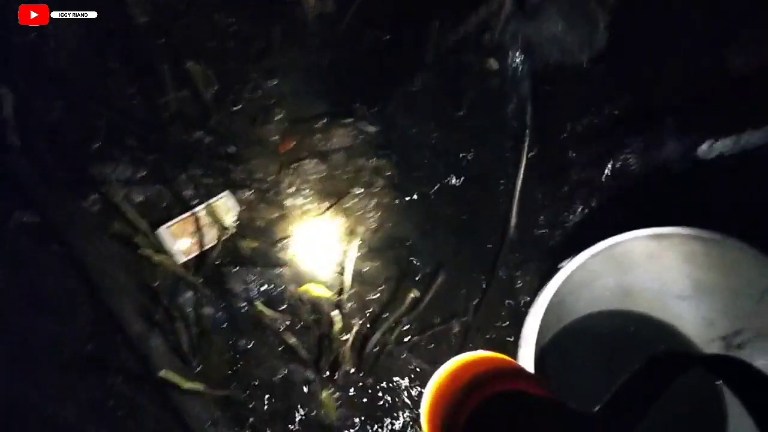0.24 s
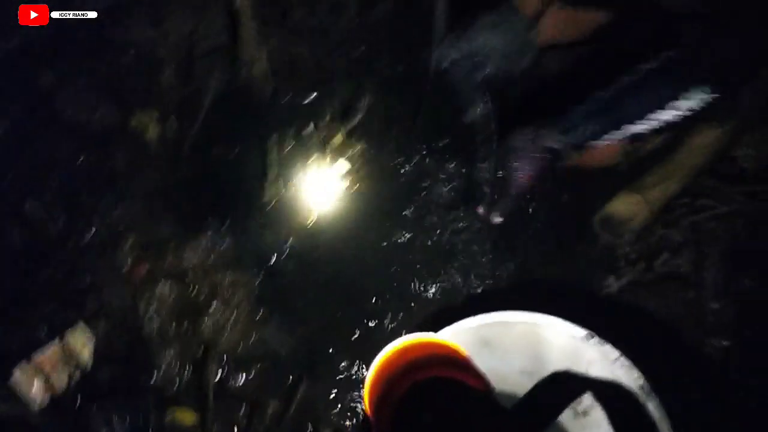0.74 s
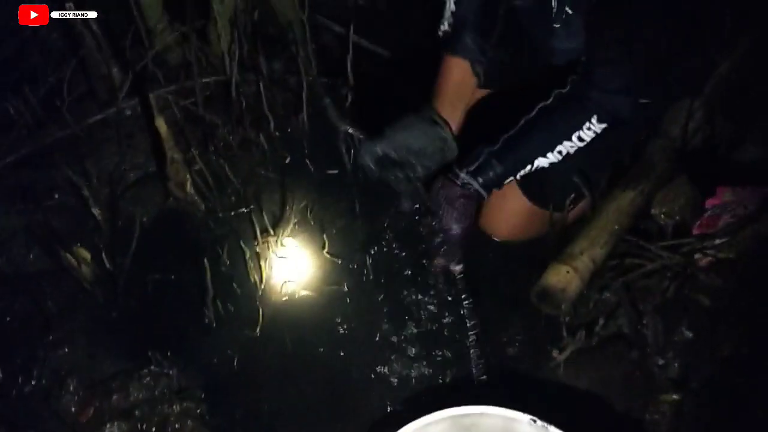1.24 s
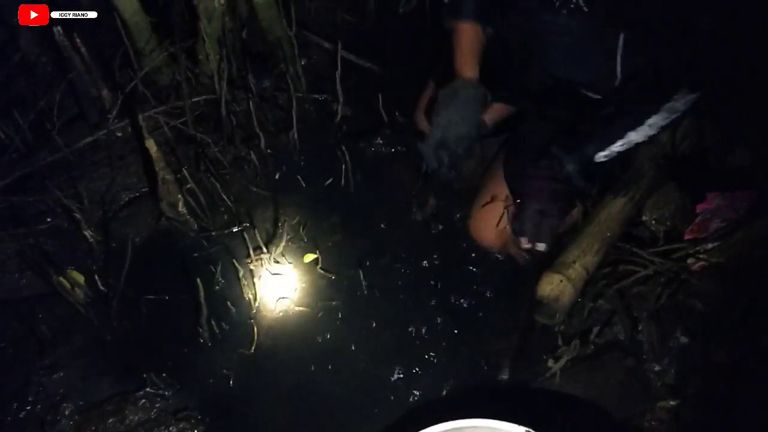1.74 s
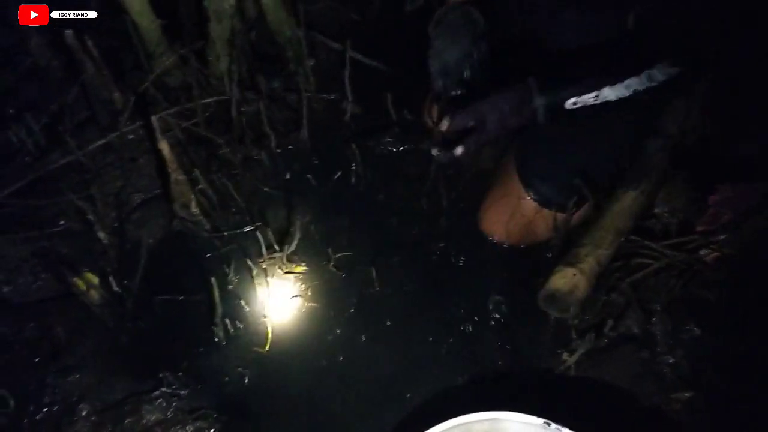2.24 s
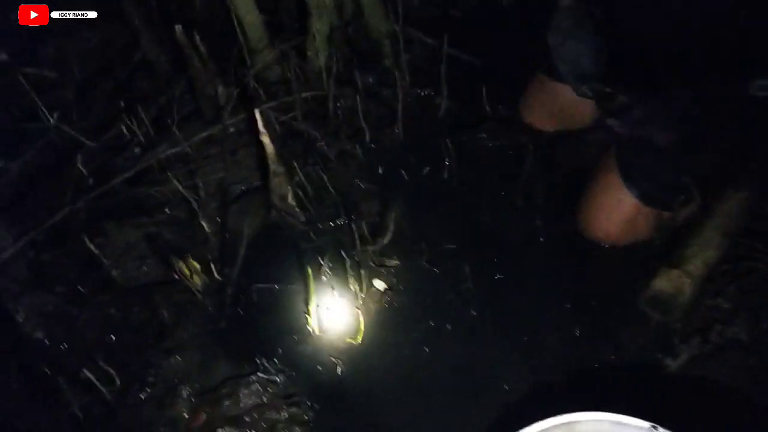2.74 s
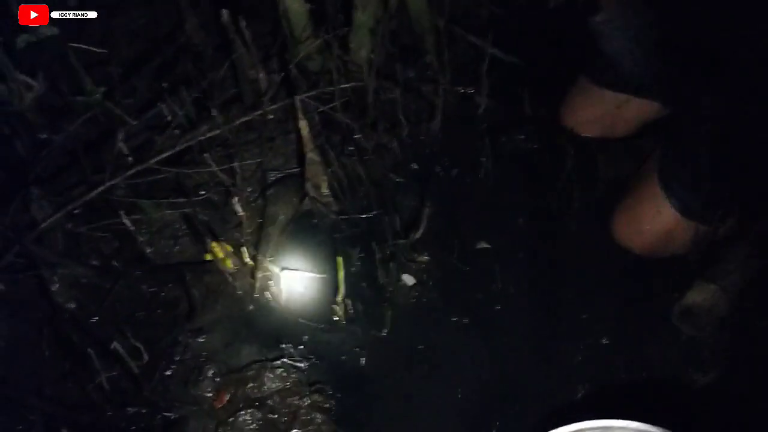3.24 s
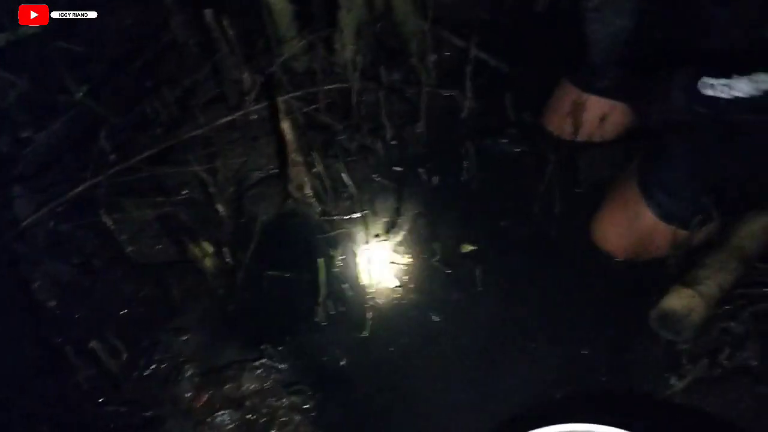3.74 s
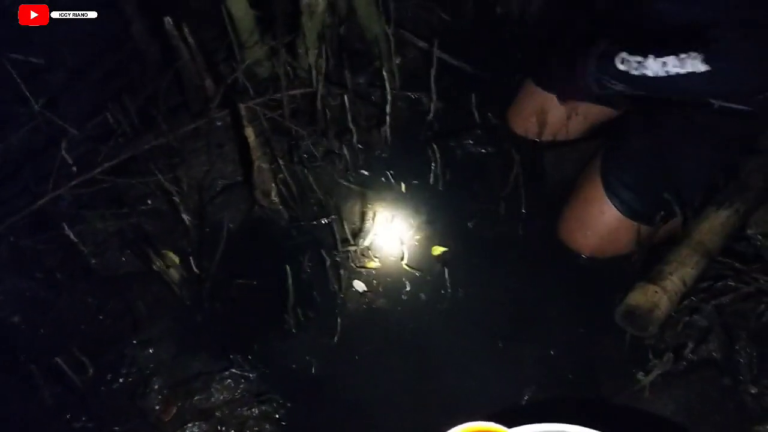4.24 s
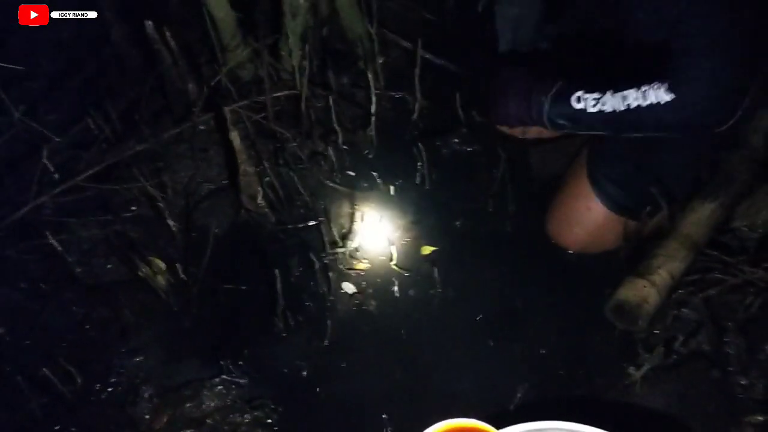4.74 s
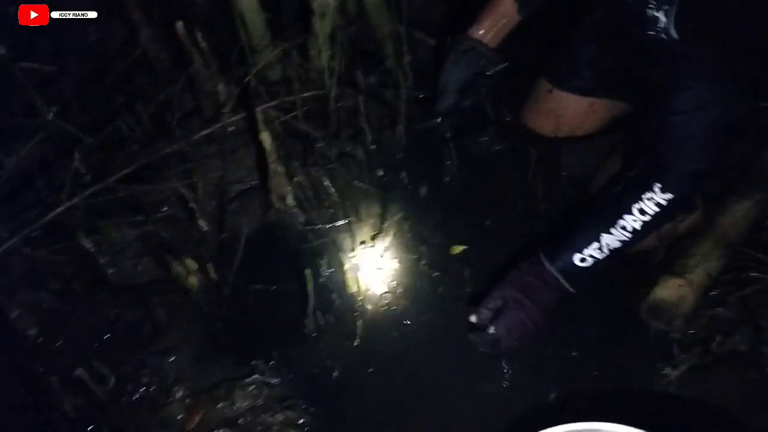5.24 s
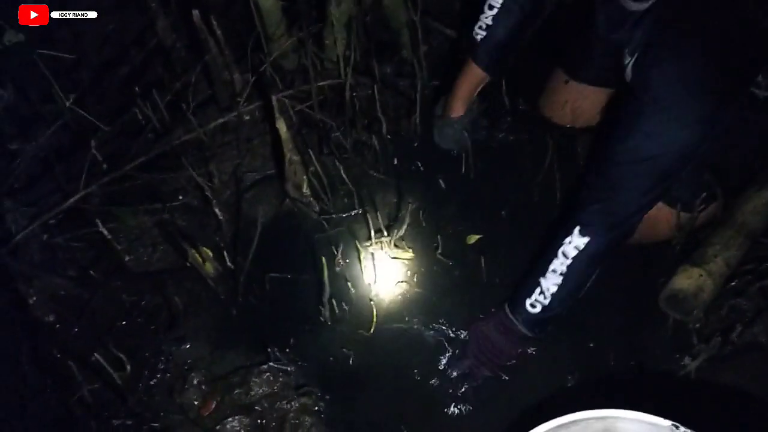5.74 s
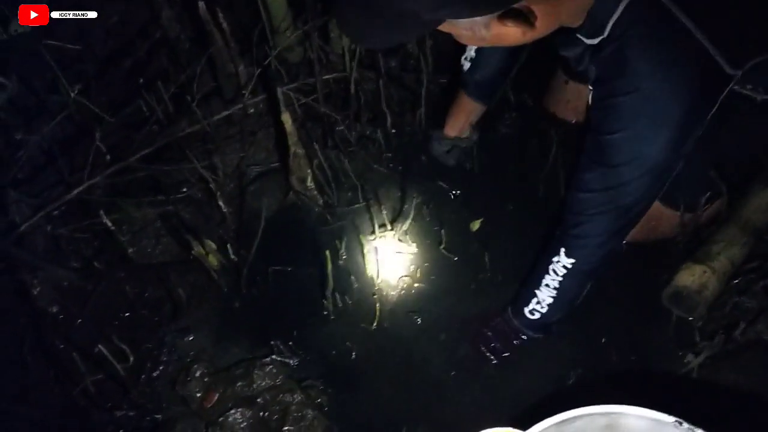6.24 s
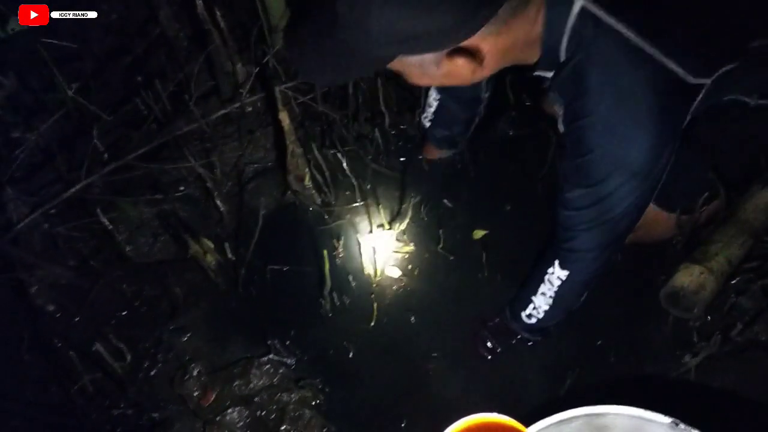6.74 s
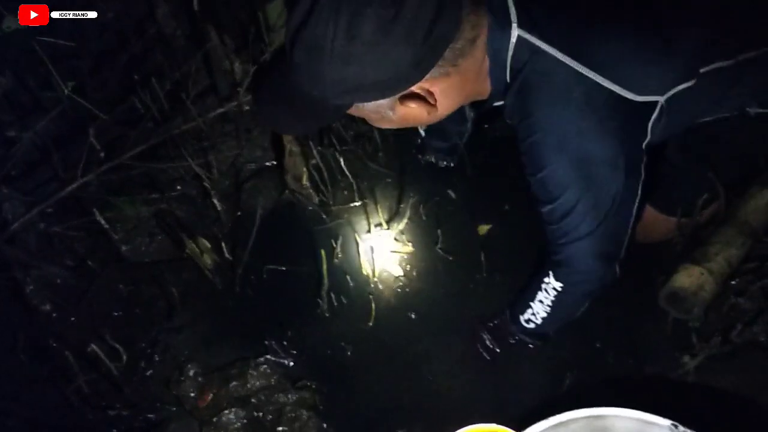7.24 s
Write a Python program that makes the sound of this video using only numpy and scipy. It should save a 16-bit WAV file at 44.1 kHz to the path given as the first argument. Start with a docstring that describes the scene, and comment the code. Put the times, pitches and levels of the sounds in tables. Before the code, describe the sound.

Dense, bright water ticks, tiny bubble plops and runoff fill the first two seconds, recorded close outdoors with no noticeable echo. One isolated sharp snap follows, then near-quiet with weak cricket chirps and faint insect buzzing. Just before the middle becomes the second half, a drop knocks the microphone: a click, heavy low thud, rumble and spray hiss. The rest is quiet, with a few small plips and a dwindling night background.

```python
"""Drops smack and bubble close to the microphone as a hand gropes in shallow water in a muddy swamp at night.
Smacks are bursts of filtered noise; bubbles and the trickle are decaying tones of gliding pitch.
One drop strikes the camera: its case rings, the microphone's diaphragm swings, rumble and spray follow.
Crickets chirp as rough tones, a katydid buzzes as clicks through a wing resonance, and faint hums waver.
The background is filtered noise that dies down, swells around the jolt and fades; a limiter ducks after peaks."""
import sys
import numpy as np
from scipy import signal
from scipy.fft import rfft, irfft, next_fast_len
from scipy.io import wavfile
from scipy.ndimage import uniform_filter1d, minimum_filter1d, map_coordinates

SR = 44100
rng = np.random.default_rng(int(sys.argv[2]) if len(sys.argv) > 2 else 0)


def put_to_file(sound):
    """Save the sound as 16-bit audio at rate SR, in the file named by the first command-line argument."""
    columns = np.atleast_2d(sound).T  # one column per channel
    safe = np.clip(columns, -1, 1)
    whole_steps = np.round(safe * 32767)
    wavfile.write(sys.argv[1], SR, whole_steps.astype(np.int16))


N = 329525

# The swamp's background over time. Each row: time in seconds, murmur level in dB, spray level in dB.
BACKGROUND = [(0, -70.5, -69.5), (.3, -67.5, -65), (1.2, -68, -65), (1.55, -69.5, -72.5), (2.9, -72, -72),
              (3.76, -73, -79.5), (3.87, -69, -79), (3.895, -66, -78), (4.7, -66, -70.5), (5.3, -70.5, -78),
              (6.4, -73, -76.5), (7.47, -76, -88.5)]
# Treble colour shared by smacks and spray. Each row: frequency in Hz, relative density in dB per Hz.
SPLASH_TREBLE = [(3240, -30.5), (5500, -13.5), (6290, -13.5), (7820, -3.5), (8950, -13.5), (10700, -12.5),
                 (13500, -4), (14800, 3.5), (15450, 2), (15700, -36), (16700, -37)]
JOLT_S = 3.7855  # when the drop strikes the camera, seconds


def amp(db):
    """Turns decibels into an amplitude factor."""
    return 10 ** (np.asarray(db) / 20)


def unit(x):
    """Scales a sound to an RMS of one."""
    return x / np.sqrt(np.mean(x ** 2) + 1e-20)


def noise():
    """White noise for the whole scene."""
    return rng.standard_normal(N)


def curves(rows):
    """One value per sample for each column after the time."""
    s, *columns = np.transpose(rows)
    return [np.interp(np.arange(N) / SR, s, column) for column in columns]


def wobble(rate):
    """A smooth random curve with rate knots a second."""
    knots = rng.standard_normal(int(N * rate / SR) + 4)
    return map_coordinates(knots, [np.arange(N) * rate / SR])


def coloured(x, spectrum):
    """Filters x causally (minimum phase, unit energy) to a spectrum of (Hz, dB) points."""
    f, db = np.transpose(spectrum)
    size = 2 ** 13
    log_f = np.log(np.fft.rfftfreq(size, 1 / SR) + 1)
    gain = amp(np.interp(log_f, np.log(f + 1), db))
    # folding the cepstrum forward in time makes the filter causal
    cepstrum = irfft(np.log(gain + 1e-4))
    cepstrum[1:size // 2] *= 2
    cepstrum[size // 2 + 1:] = 0
    kernel = irfft(np.exp(rfft(cepstrum)))
    return signal.fftconvolve(x, kernel / np.linalg.norm(kernel))[:N]


def add(track, s, sound):
    """Mixes a sound into the track from time s, in place."""
    part = track[round(s * SR):][:len(sound)]
    part += sound[:len(part)]


def swell(length, edge):
    """Time axis and a soft-edged plateau, length seconds wide at half height."""
    t = np.arange(round((length + edge) * SR)) / SR
    nearest_end = np.minimum(t, t[-1] - t)
    return t, np.sin(np.pi / 2 * np.clip(nearest_end / edge, 0, 1)) ** 2


def bubble(hz, length, climb):
    """A bubble rings unevenly, its pitch gliding as it nears the surface; ripples and roots scatter rough echoes."""
    t = np.arange(round(length * SR)) / SR
    age = t / t[-1]
    phase = 2 * np.pi * np.cumsum(hz * climb ** age) / SR
    # a new random level every three cycles, joined by straight lines
    flutter_db = 3 * np.interp(t * hz / 3, np.arange(20), rng.standard_normal(20))
    flutter_db -= flutter_db.mean()
    soft_start = 1 - np.exp(-t / 0.00014)
    ring = np.sin(phase) * soft_start * amp(flutter_db - 3.9 * age) * np.sqrt(1 - age ** 2)
    # the water slaps shut: noise smoothed by one cycle of the pitch, gone in 14 cycles
    cycle = np.sin(2 * np.pi * hz * t[t < 1 / hz])
    slap = np.convolve(rng.standard_normal(len(t)), cycle, "same")
    ring += 0.15 * amp(-60 * t * hz / 14) * slap
    lag = np.arange(SR // 40) / SR
    echoes = amp(-25.5 - 60 * lag / 0.068) * rng.standard_normal(len(lag))
    echoes[0] = 1  # the direct sound
    return signal.fftconvolve(ring, echoes)


def droplets():
    """Fine spray: each droplet is a tick of a few cycles at its own high pitch."""
    when, pitch, size = rng.random((2500, 3)).T
    t = np.arange(SR // 150) / SR
    hz = 5500 * 2.8 ** (pitch[:, None] ** .45)
    # many small droplets and few large ones, up to 22 dB louder
    sizes = amp(np.minimum(-5.5 * np.log(1 - size), 22))[:, None]
    decay = amp(-60 * t * hz / 9)
    ticks = sizes * np.sin(2 * np.pi * hz * t) * decay * (1 - np.exp(-t * hz))
    places = (when * N).astype(int)[:, None] + np.arange(len(t))
    return unit(coloured(np.bincount(places.ravel(), ticks.ravel(), N), SPLASH_TREBLE))


def night():
    """Air rumbles on the microphone, the swamp murmurs, far insects hush, and spray hisses and ticks in the treble."""
    # Colours of the three beds. Each row: frequency in Hz, relative density in dB per Hz.
    rumble_colour = [(12, -38), (20, -1.5), (78, -1.5), (135, -4.5), (500, -17.5), (650, -53), (1100, -120)]
    murmur_colour = [(200, -8), (700, 0), (2570, -4.5), (3090, -1.5), (3470, -11.5), (5400, -17.5),
                     (6000, -39)]
    hush_colour = [(5000, -21), (6030, -15), (7380, 0.5), (8600, -24.5), (14900, -15), (15500, -15),
                   (15700, -63.5)]
    rumble_db, hush_db = 3, -3.5  # gains over the murmur
    murmur_db, spray_db = curves(BACKGROUND)
    rumble = unit(amp(1.4 * wobble(16)) * coloured(noise(), rumble_colour))
    murmur = amp(1.46 * wobble(8.2)) * coloured(noise(), murmur_colour)
    hush = amp(0.73 * wobble(7.4)) * coloured(noise(), hush_colour)
    spray = amp(3.3 * wobble(25)) * coloured(noise(), SPLASH_TREBLE)
    spray += amp(0.37 * (spray_db + 67)) * droplets()  # busier water ticks more
    bed = murmur + amp(rumble_db) * rumble + amp(hush_db) * hush
    return amp(murmur_db) * bed + amp(spray_db) * spray


def hums():
    """Narrow tones from far away: a random walk of the phase broadens each, and the level flickers."""
    # Each row: start in seconds, length in seconds, pitch in Hz, width in Hz, level in dB before the flicker.
    far_tones = [(0.127, 0.307, 356.6, 28.7, -63), (0.157, 0.263, 1816, 75, -65)]
    track = np.zeros(N)
    for s, length, hz, width_hz, db in far_tones:
        t, shape = swell(length, edge=0.033)
        drift = np.cumsum(rng.standard_normal(len(t))) * np.sqrt(2 * np.pi * width_hz / SR)
        add(track, s, amp(db) * shape * np.sin(2 * np.pi * hz * t + drift))
    return track * amp(3.5 * wobble(45))


def crickets():
    """Crickets rasp short tones, rough in pitch and level, over a steady choir of narrow-band noise."""
    # Each row: start in seconds, pitch in Hz before the waver, length in ms at half height.
    chirp_rows = [(0.013, 6160, 40), (0.311, 6100, 40), (1.577, 5920, 33), (1.663, 6200, 40),
                  (1.866, 5940, 18), (1.956, 6200, 29), (2.13, 6170, 31), (2.286, 6040, 31),
                  (2.412, 6160, 27), (3.282, 5930, 45), (3.448, 6230, 30), (3.562, 5970, 45),
                  (3.728, 6250, 25), (4.105, 6180, 44), (4.205, 6380, 42), (4.5, 6380, 33),
                  (5.02, 6250, 40), (5.05, 5900, 40), (5.325, 5930, 32), (5.46, 6130, 65),
                  (5.745, 6110, 53), (6.0, 6370, 38), (6.295, 6330, 25), (6.634, 6120, 8),
                  (6.758, 6230, 34), (6.81, 6130, 11), (6.992, 6110, 8), (7.048, 6180, 25), (7.17, 6040, 8),
                  (7.35, 6000, 10), (7.425, 6220, 23)]
    chirp_db, choir_db = 3, -12  # gains over the murmur
    chirps = np.zeros(N)
    for s, hz, length_ms in chirp_rows:
        t, shape = swell(length_ms / 1000, edge=0.01)
        add(chirps, s, shape * np.cos(2 * np.pi * hz * t))
    # a random frequency shift, 40 Hz deep per unit of wobble
    waver = 2 * np.pi * np.cumsum(40 * wobble(120)) / SR
    chirps = np.real(signal.hilbert(chirps) * np.exp(1j * waver))
    choir_colour = [(5500, -60.0), (5900, 4.0), (6200, 14.5), (6450, -21.0), (6900, -62.0)]
    choir = coloured(noise(), choir_colour)
    flicker_db, swell_db = 3 * wobble(90), 3 * wobble(20)
    singing = amp(chirp_db + flicker_db) * chirps + amp(choir_db + swell_db) * choir
    return amp(curves(BACKGROUND)[0]) * singing


def katydid():
    """The katydid scrapes regular clicks into a broad high wing resonance."""
    # Each value: time of a buzz in seconds, 35 ms after it begins to rise.
    buzz_times = [1.58, 1.75, 2.43, 3.09, 3.33, 4.51, 4.82, 5.831, 6.15, 7.0, 7.19]
    # The wing's resonance. Each row: frequency in Hz, relative density in dB per Hz.
    wing_colour = [(8500, -30), (10200, -7), (11000, -2), (11800, 0), (12900, -5), (14000, -30)]
    buzz_db, teeth_hz = 9, 370  # gain over the murmur, clicks per second
    clicks = np.zeros(N)
    t, shape = swell(.13, edge=.09)
    teeth = np.sinc(.8 * SR / teeth_hz * ((teeth_hz * t) % 1 - .5))
    for s in buzz_times:
        add(clicks, s - .035, shape * teeth)
    clicks = clicks * amp(3 * wobble(40))
    return amp(curves(BACKGROUND)[0] + buzz_db) * coloured(clicks, wing_colour)


def aftermath():
    """After the jolt the camera rocks with a low rumble while spray from the burst drop hisses down."""
    shake_db, shake_t60_s = -49.5, 2.4  # level at the jolt, time to fall 60 dB
    shower_db, shower_t60_s = -40.5, 0.56
    t = np.arange(N) / SR - JOLT_S
    shake_colour = [(10, -31), (22, -11), (40, 0), (120, -21.5), (400, -62.0)]
    rocking = unit(coloured(noise(), shake_colour))
    shake = amp(shake_db - 60 * t / shake_t60_s) * rocking
    shower = amp(shower_db - 60 * t / shower_t60_s) * coloured(noise(), SPLASH_TREBLE)
    return (t > 0) * (shake + shower)


def jolt():
    """The blow rings the case and throws the diaphragm out; it swings through rest and creeps back slowly."""
    # The case's resonances. Each row: frequency in Hz, level in dB, time to fall 60 dB in seconds.
    case_rings = [(900, -19.5, 0.0066), (2110, -22, 0.0064)]
    throw_size, throw_s = 0.31, 0.044  # full scale, time constant in seconds
    creep_size, creep_s = 0.18, 0.26
    t = np.arange(3 * SR) / SR
    throw = throw_size * (1 + t / throw_s) * np.exp(-t / throw_s)
    creep = creep_size * np.exp(-t / creep_s)
    soft_start = 1 - np.exp(-t / 0.000125)
    ring = sum(amp(db - 60 * t / t60) * np.sin(2 * np.pi * hz * t) for hz, db, t60 in case_rings)
    track = np.zeros(N)
    add(track, JOLT_S, (throw - creep) * soft_start + ring)
    return track


def trickle():
    """Water runs off the hand: a crowd of small bubbles, each gliding upward."""
    # Each row: time in seconds, gurgle level in dB.
    gurgle_level = [(0, -74), (.1, -60.5), (.45, -65.5), (.7, -73.5), (1.0, -61.5), (1.35, -72),
                    (1.55, -60), (1.7, -88), (4.1, -87), (4.27, -67), (4.36, -66), (4.5, -84), (7.47, -95)]
    gurgle = np.zeros(N)
    for when, pitch, size, glide in rng.random((2400, 4)):
        hz = 1250 * 3.6 ** pitch
        life = (5 + 9 * glide) / hz  # 5 to 14 cycles of the first pitch
        loudness = amp(min(-4.5 * np.log(1 - size), 14))  # mostly small, a few up to 14 dB louder
        add(gurgle, when * N / SR, loudness * bubble(hz, life, 1 + 0.5 * glide ** 2))
    return amp(curves(gurgle_level)[0]) * unit(gurgle)


def bubbles():
    """The single bubbles left by drops, each a ringing tone that stands out."""
    # Each row: start in seconds, level in dB, first pitch in Hz, last over first pitch, life in ms.
    bubble_rows = [(.099, -45, 1950, .95, 8), (0.109, -44.5, 1720, 1.04, 8), (0.12, -50, 1300, 1.3, 8),
                   (0.15, -46, 2900, 1.05, 7), (0.228, -48.5, 1330, 1.03, 14), (.247, -45.5, 1800, 4.1, 10),
                   (.38, -54, 2050, 1.1, 10), (.41, -59, 2900, .97, 9), (.443, -50, 1560, 1.03, 16),
                   (.47, -47, 2600, 1.1, 6), (.53, -55, 1650, 1.15, 9), (.546, -59, 713, 1.1, 20),
                   (.578, -53, 2800, 1, 10), (.634, -52, 1800, 1, 7), (.735, -53, 1310, 1.32, 11),
                   (.796, -51.5, 2620, 1.35, 6), (.824, -45.5, 2200, 1.03, 9), (.901, -46.5, 565, 1.05, 20),
                   (0.923, -53, 1600, 1.02, 8), (.938, -52, 1600, 1, 10), (.968, -50, 1360, 1.1, 10),
                   (1.03, -48, 1300, 1.1, 12), (1.119, -34, 1560, 0.87, 8), (1.129, -33, 1640, .9, 9),
                   (1.128, -43, 2300, 1.25, 7), (1.265, -51.5, 2370, 1.13, 6), (1.323, -46, 2920, 1.14, 5),
                   (1.3355, -40, 2100, 1, 6), (1.378, -52, 1600, 1, 8), (1.546, -52, 3020, 0.94, 4),
                   (1.606, -59, 1073, 1.08, 12), (1.801, -44.5, 1334, 0.92, 9), (1.806, -54.5, 440, 1, 28),
                   (1.899, -54.5, 2000, 1.1, 7), (2.089, -53, 2200, 1.9, 5), (2.155, -59, 1100, 1.87, 16),
                   (2.252, -57, 1160, 2.6, 27), (2.262, -56, 1480, 0.96, 14), (2.305, -62, 930, 1.65, 30),
                   (2.326, -61, 1490, 1.03, 18), (2.612, -37, 2750, 1.2, 6), (2.861, -61, 1150, 0.8, 9),
                   (2.868, -63, 520, 1.15, 20), (2.916, -56.5, 2150, 1.35, 6), (2.99, -53, 700, 2.2, 8),
                   (3.066, -59.5, 2150, 1.15, 7), (4.248, -59, 1100, 1.4, 6), (4.271, -48, 1600, 1.5, 9),
                   (4.3, -63, 800, 1.05, 18), (5.347, -55.5, 797, 1, 26), (5.922, -54, 1450, 2.4, 11),
                   (5.968, -56, 2500, 2.2, 11)]
    track = np.zeros(N)
    for s, db, hz, climb, life_ms in bubble_rows:
        add(track, s, amp(db) * bubble(hz, life_ms / 1000, climb))
    return track


def smacks():
    """Drops smack water and leaves: a sharp spike and a crack of a few ms, scattered into a hissing tail."""
    # Each row: start in seconds, crack level in dB, body against treble in dB.
    smack_rows = [(0.153, -35.5, -3.5), (0.211, -36.5, -8), (0.48, -37.5, -7), (0.5053, -42.5, 0),
                  (.59, -40, -9), (0.6193, -35.5, -17), (0.6971, -41.5, -2), (.709, -43, -18),
                  (0.7316, -34.5, -20), (0.755, -51, -25), (0.793, -37, -20), (.83, -34, -5),
                  (0.873, -45, -20), (0.9027, -32, -14), (0.9773, -34, -7), (0.9836, -29.5, -10.5),
                  (1.0084, -39, -11), (1.034, -44, 1), (1.071, -53, -30), (1.102, -34, -10),
                  (1.1177, -51, 15.5), (1.128, -19.5, -19), (1.266, -37, -13), (1.3365, -34, -6),
                  (1.348, -11.5, -7.5), (1.42, -29, -28), (1.4458, -27, -15), (1.5299, -38.5, -11),
                  (1.695, -42.5, -14), (1.746, -44.5, -5.5), (1.8017, -38.5, 5), (1.8057, -47, -14),
                  (1.8953, -49, -3), (1.925, -45, -20), (1.947, -40, -33), (1.9757, -48, -3),
                  (2.043, -40.5, -12), (2.047, -40.5, -10), (2.0911, -37, -6.5), (2.0977, -37.5, -11),
                  (2.283, -53, -25), (2.405, -51, -30), (2.612, -13, -22), (2.9913, -45, 5),
                  (3.7856, -16.5, -14.5), (4.154, -47, -43), (4.273, -45, -2), (4.3325, -39, -16),
                  (4.492, -48, -19), (4.7503, -50, -2), (4.8528, -46, -4.5), (5.1203, -47, -9),
                  (5.468, -50, -9), (5.512, -51, -9), (5.5404, -43.5, -9), (5.5584, -39.5, -2.5)]
    # Colour of the body. Each row: frequency in Hz, relative density in dB per Hz.
    body_colour = [(120, -57.5), (200, -20.5), (1040, -13), (1390, -7.5), (3200, -3.5), (4600, -10),
                   (7150, -83), (12100, -120)]
    tail_db, tail_grows, tail_t60_s = -56, 0.76, 0.27  # after a -34.5 dB crack, dB per dB of crack, decay
    treble, body = np.zeros(N), np.zeros(N)
    t = np.arange(SR // 3) / SR
    spike = 0.97 * amp(-60 * t / 0.0055)
    crack = (spike + 0.24 * amp(-60 * t / 0.029)) * (1 - np.exp(-t / 0.0005))
    for s, db, body_db in smack_rows:
        tail = amp(tail_db + tail_grows * (db + 34.5) - 60 * t / tail_t60_s)
        add(treble, s, (amp(db) * crack + tail) * rng.standard_normal(len(t)))
        body_shape = amp(body_db) * (amp(db) * crack + 0.62 * tail)
        add(body, s, body_shape * rng.standard_normal(len(t)))
    return coloured(treble, SPLASH_TREBLE) + coloured(body, body_colour)


def scene():
    """Sums the layers, from the far background to the drops close by."""
    background = night() + hums() + crickets() + katydid()
    struck_camera = aftermath() + jolt()
    water = trickle() + bubbles() + smacks()
    return (background + struck_camera + water)[None]


def record(dry):
    """After a peak over its threshold the limiter sinks slowly, holds a tenth of a second and lets go; then the band limit."""
    threshold_db, top_hz = -16, 16800
    hold, sink = SR // 10, SR // 25  # samples
    level_db = 20 * np.log10(np.abs(dry) + 1e-9)
    need_db = -np.maximum(level_db - threshold_db, 0)
    # these origins make both windows look back only
    held = minimum_filter1d(need_db, hold, origin=(hold - 1) // 2)
    ramp = uniform_filter1d(held, sink, origin=(sink - 1) // 2)
    gain_db = uniform_filter1d(np.maximum(held, ramp), size=90)
    m = next_fast_len(N + SR)
    in_band = np.fft.rfftfreq(m, 1 / SR) < top_hz
    return irfft(rfft(dry * amp(gain_db), m) * in_band, m)[:, :N]


dry = scene()
out = record(dry)
put_to_file(out)
```